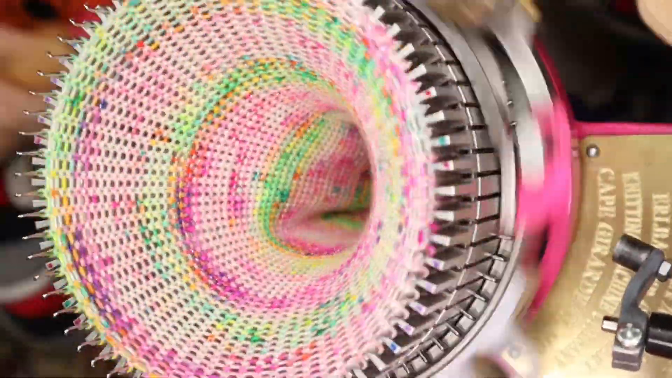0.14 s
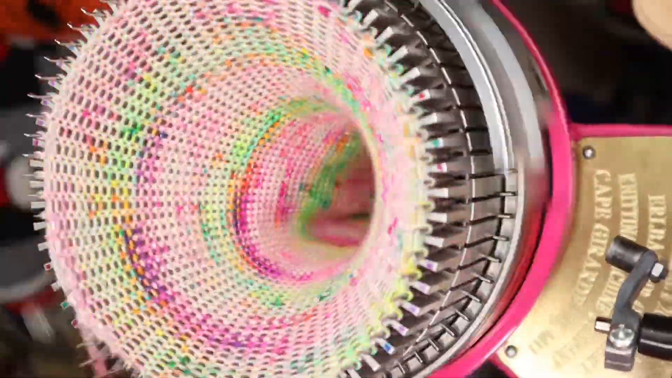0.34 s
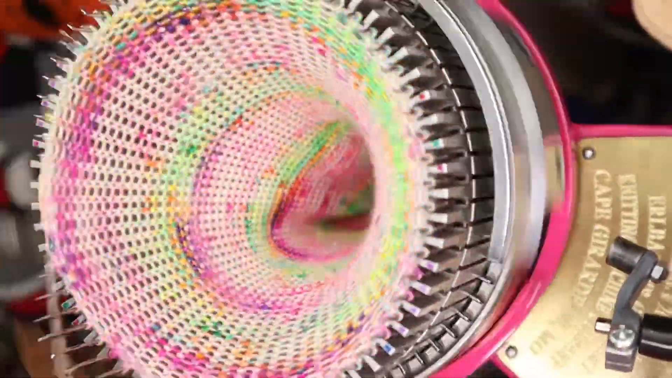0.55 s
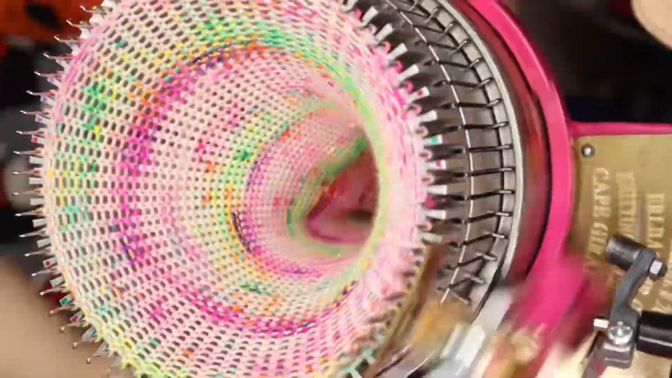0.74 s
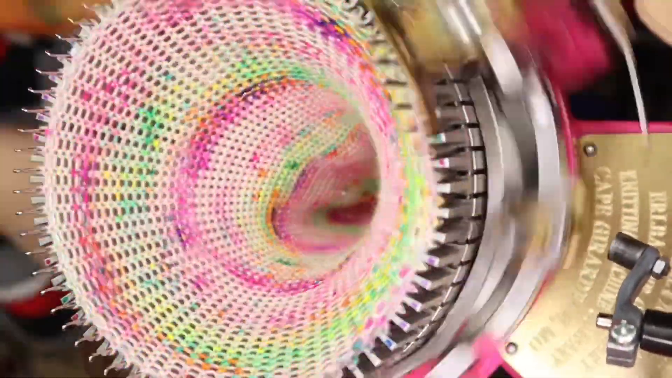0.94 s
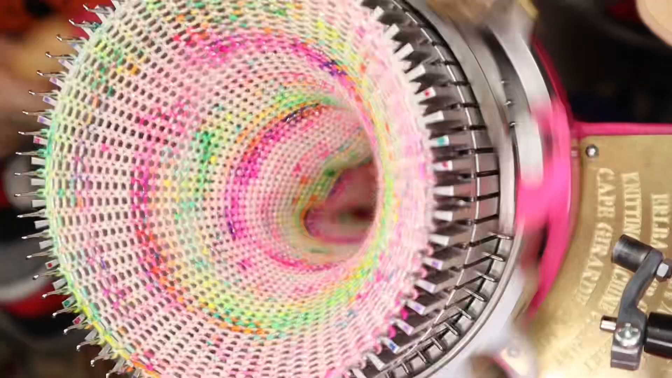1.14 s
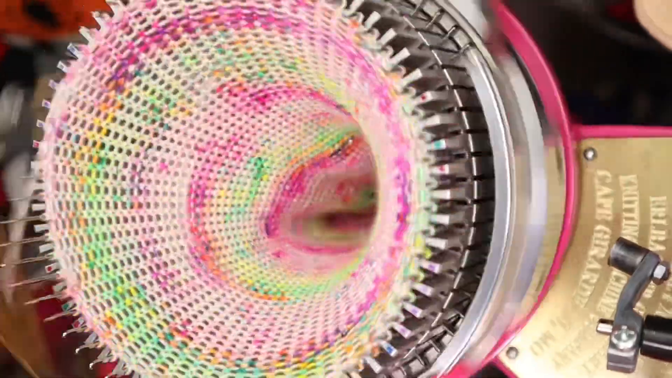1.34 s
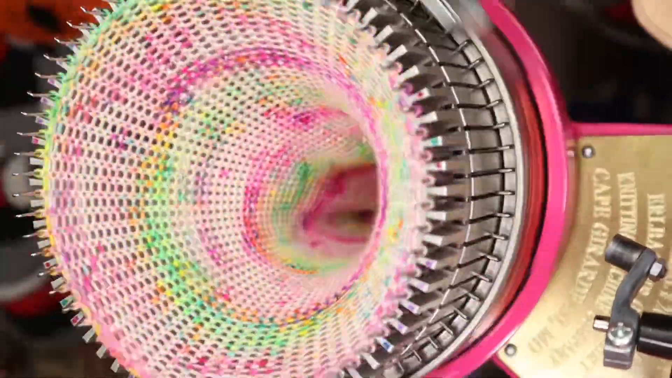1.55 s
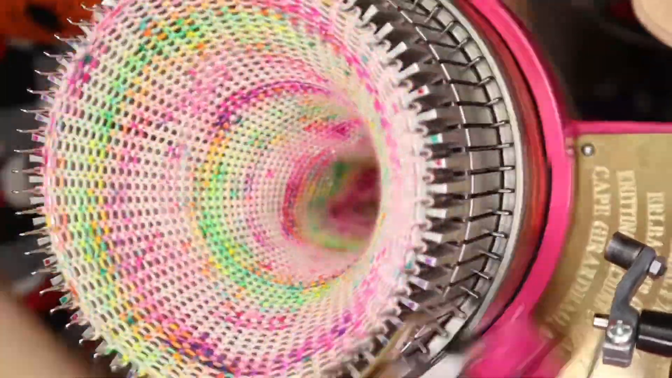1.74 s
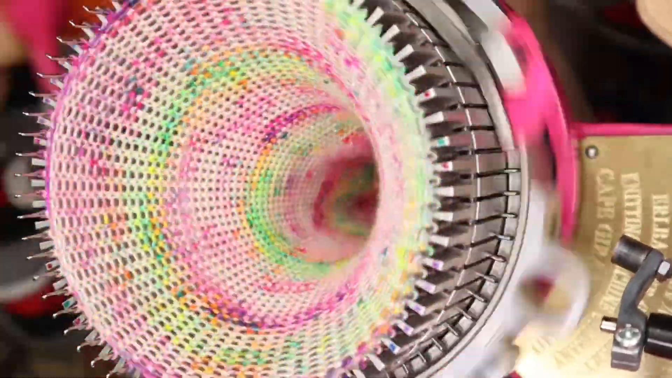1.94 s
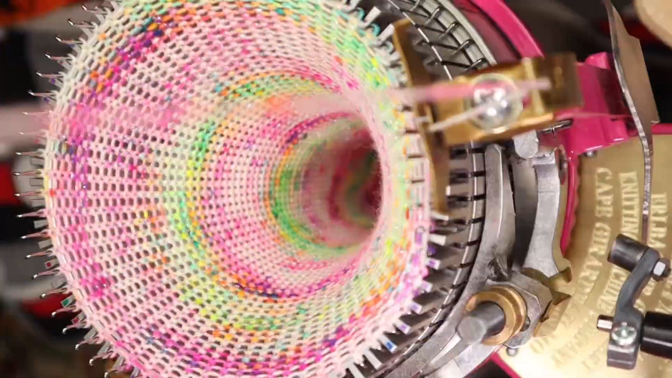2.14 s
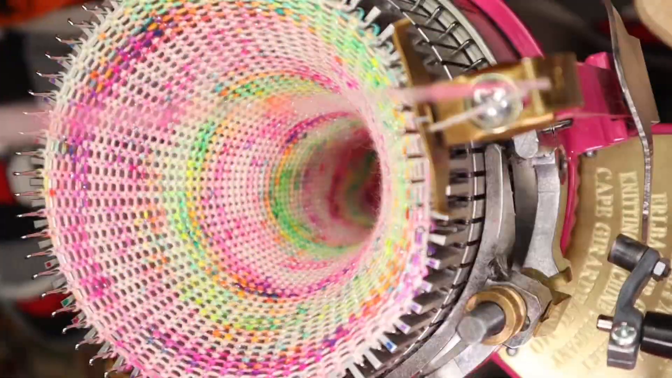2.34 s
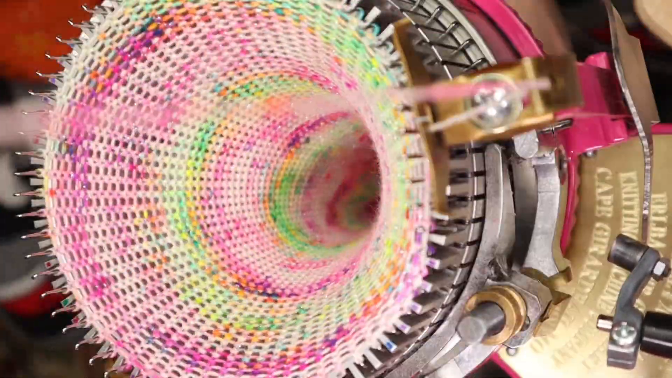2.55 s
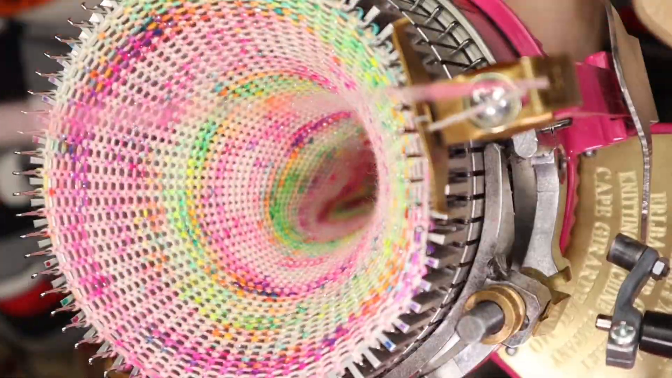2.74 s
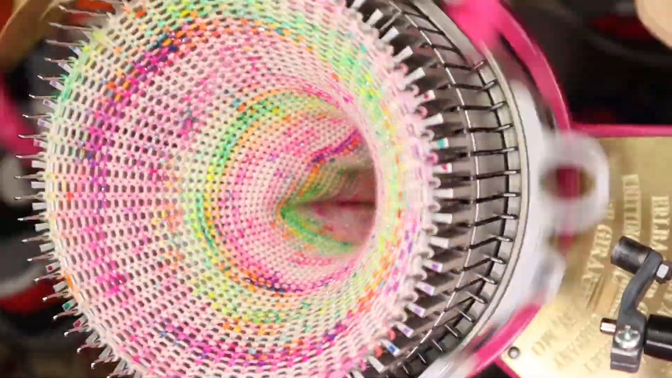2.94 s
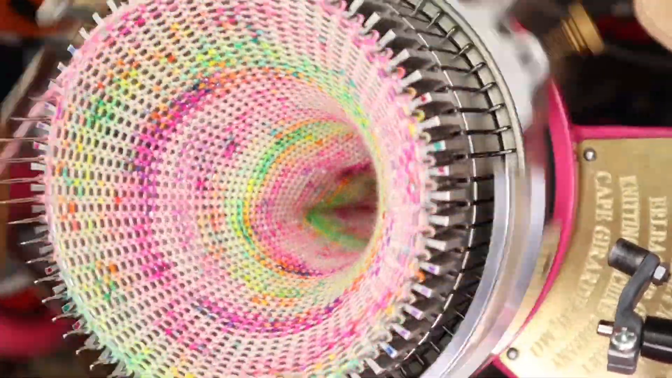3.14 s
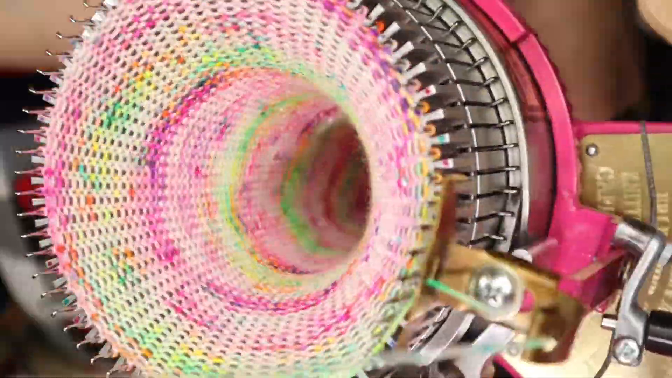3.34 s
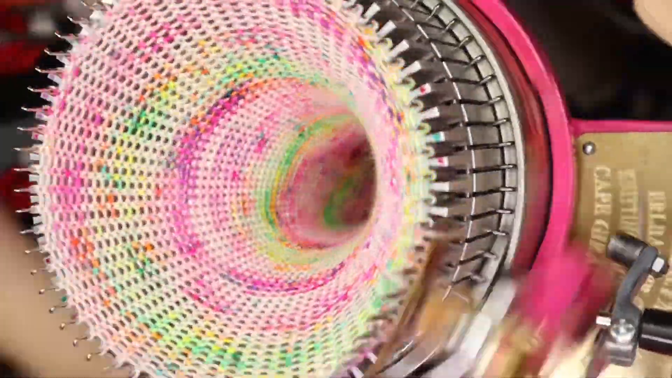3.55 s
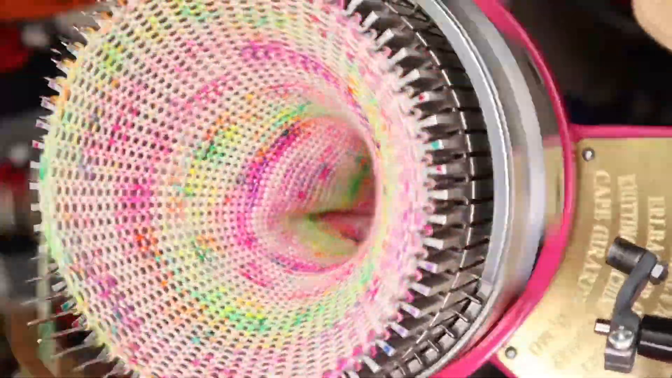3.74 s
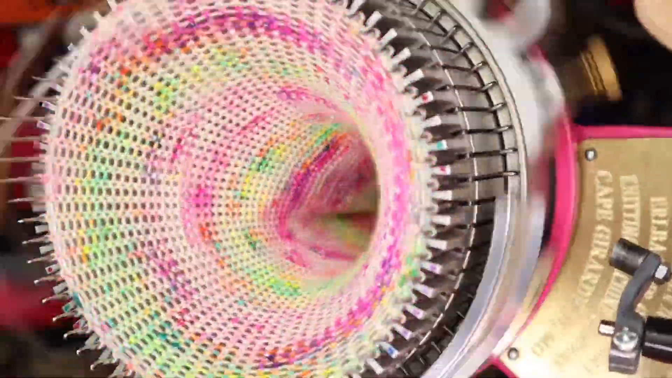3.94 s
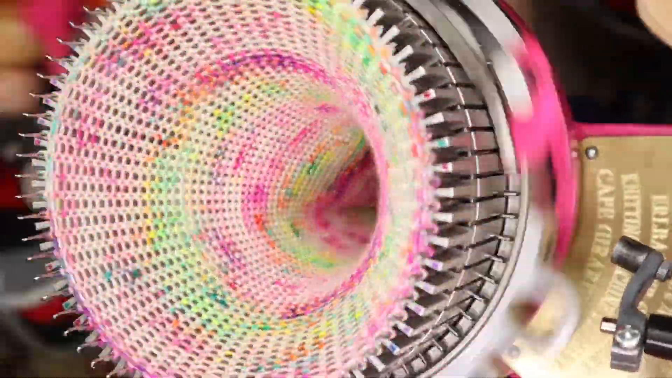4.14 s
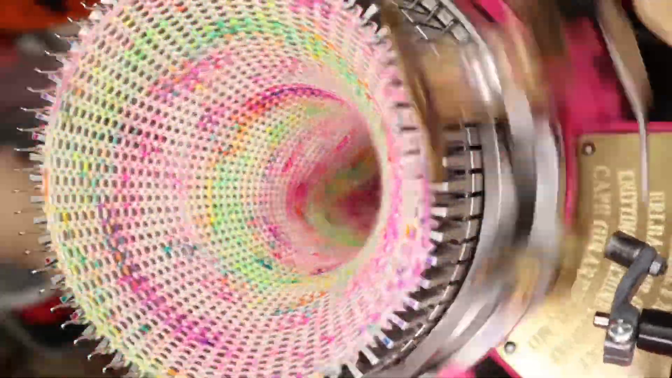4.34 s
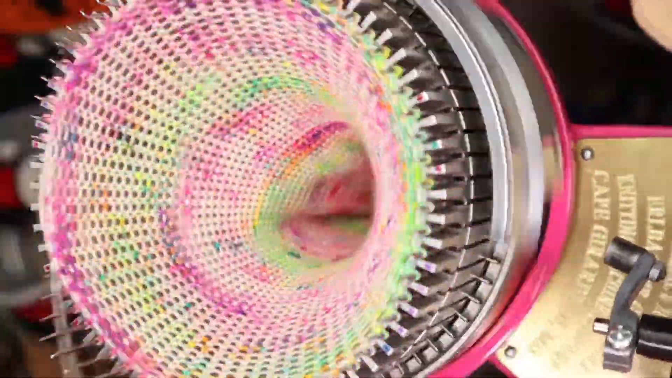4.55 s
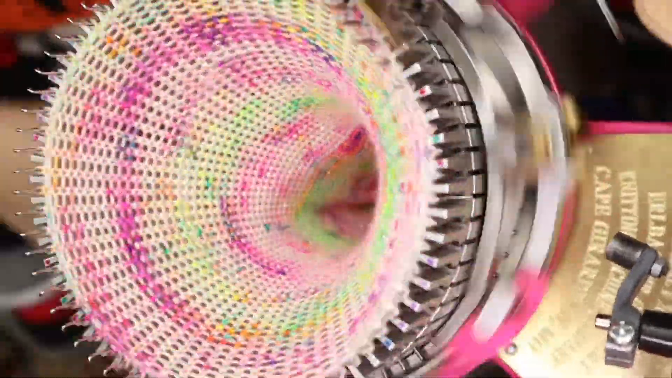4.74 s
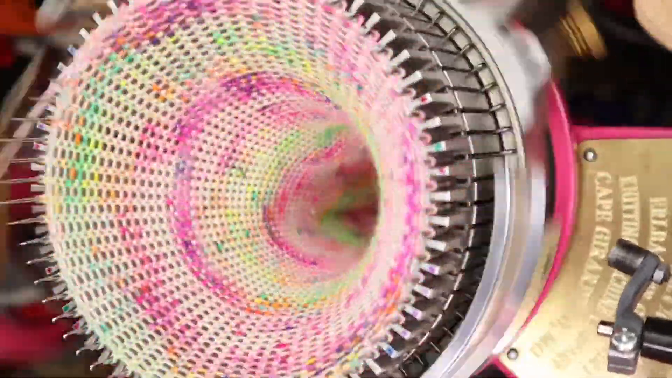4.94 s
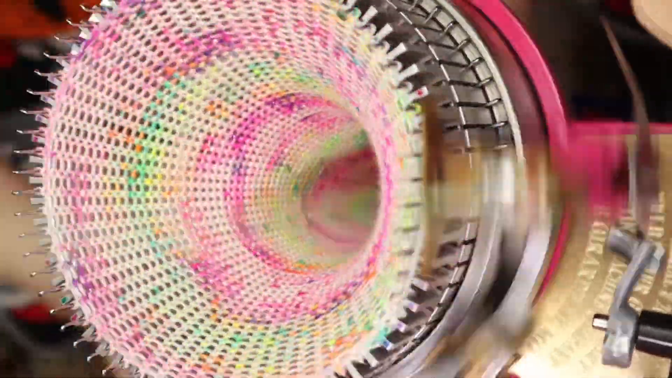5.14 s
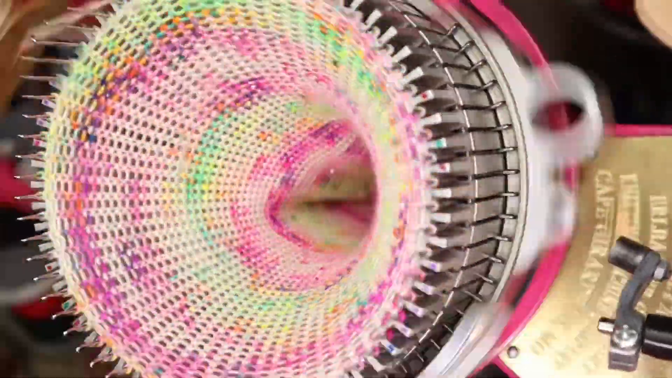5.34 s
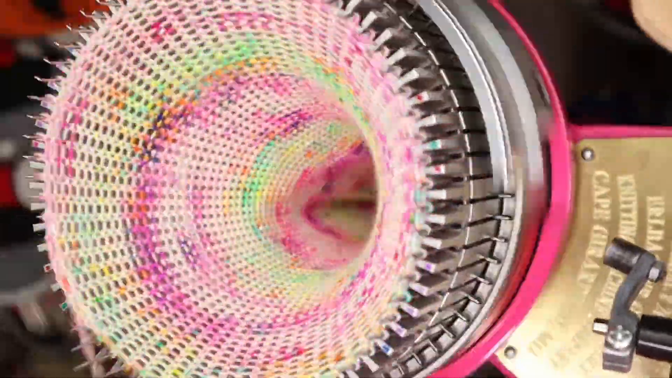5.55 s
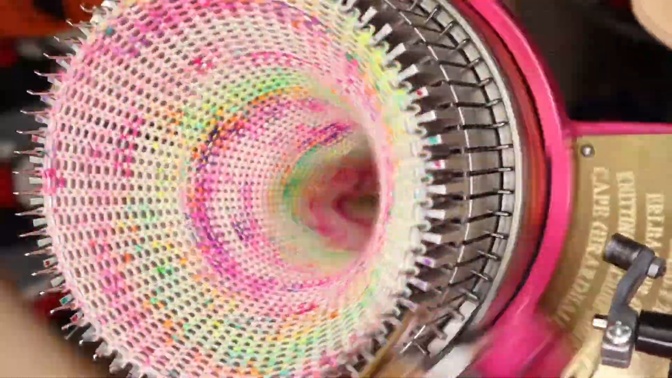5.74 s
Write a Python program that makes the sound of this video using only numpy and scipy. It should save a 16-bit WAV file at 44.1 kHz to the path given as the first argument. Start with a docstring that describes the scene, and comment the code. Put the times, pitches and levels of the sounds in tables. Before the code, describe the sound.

A hand-cranked circular knitting machine runs close to the microphone, its metal needles making a bright, buzzing rasp with a sharp clack about seven times a second. After about two and a half seconds it stops abruptly. Loose parts click, needles tick and yarn rustles faintly under the hands. Then the machine starts again, a little slower, and keeps clattering. The room is small and dry, with faint steady air noise.

```python
"""A hand-cranked sock knitting machine runs close by, indoors, at about seven turns a second.
In each turn the cams strike 72 needles: the train of impacts buzzes, excites the resonances of one
metal part after another and ends in a double clack. Near 2.5 s the machine stops; loose parts click,
hands rub the yarn and needles settle. At 4 s it starts again, a little slower.
A small dry room and its steady air noise lie behind it all."""
import sys
import numpy as np
from scipy import signal
from scipy.fft import rfft, irfft, next_fast_len
from scipy.io import wavfile
from scipy.ndimage import uniform_filter1d

SR = 44100
rng = np.random.default_rng(int(sys.argv[2]) if len(sys.argv) > 2 else 0)


def inscribe(sig):
    """Save sig as 16-bit PCM at rate SR to the path in sys.argv[1].

    A 1-D sig is mono; a 2-D sig holds one channel per row.
    Samples are clipped to [-1, 1] before scaling.
    """
    pcm = np.round(np.clip(np.atleast_2d(sig).T, -1, 1) * 32767)
    wavfile.write(sys.argv[1], SR, pcm.astype(np.int16))


N = 255151
TIME = np.arange(N) / SR
STOP_S, RESTART_S = 2.467, 4.018  # the cams stand still in between
# the clack that ends each turn; the spacing sets the speed: t/s, relative level/dB
CLACKS = [(0.0448, -25.5), (0.1785, -22), (0.3048, -22.5), (0.4353, -28), (0.5753, -26.5), (0.7213, -24.5),
          (0.8618, -20), (0.9951, -22.5), (1.1334, -24.5), (1.267, -22.5), (1.4038, -21.5), (1.5395, -24),
          (1.6813, -24.5), (1.8088, -26), (1.935, -22.5), (2.0675, -25.5), (2.2042, -29.5), (2.3299, -26),
          (4.2141, -24), (4.4333, -23), (4.6105, -26), (4.7697, -25), (4.9382, -24.5), (5.1002, -23),
          (5.2723, -24.5), (5.434, -24.5), (5.594, -22), (5.754, -22.5)]


def machine(usual_turns_per_s=7.32):
    """Source and resonator: needle impacts excite the metal parts, most of them harder with speed."""
    # load on the needles, peaking before the clack: gain/dB, place/turns, spread/turns
    load = [(1.73, 0.827, 0.046), (-1.3, 0.18, 0.07)]
    angle, speed = cam_motion()
    pace = speed / usual_turns_per_s
    ticks = needle_ticks(angle)
    out = pace ** .9 * (slot_rasp(ticks) + cylinder_ring(ticks, angle))
    out += needle_ring(ticks, angle, pace)
    out *= amp(sum(db * near(angle, place, spread) for db, place, spread in load))
    out += shell_ring(ticks, angle) + clack(angle, pace) + gear_groans(angle, speed)
    return out * running()


def turn_ends():
    """Bounds of the rotation periods in s: clacks, stop, restart and one more at each end."""
    s = np.sort(np.r_[np.array(CLACKS)[:, 0], STOP_S, RESTART_S])
    return np.r_[2 * s[0] - s[1], s, 2 * s[-1] - s[-2]]


def cam_motion():
    """Rotation: the angle in turns, and the running speed in turns/s as the inverse of the period."""
    s = turn_ends()
    moving = s[:-1] != STOP_S
    middle, period = (s[:-1] + s[1:]) / 2, np.diff(s)
    angle = np.interp(TIME, s, np.r_[0, np.cumsum(moving)])
    return angle, np.interp(TIME, middle[moving], 1 / period[moving])


def running(brake_s=.013, release_s=.012, attack_s=.014):
    """Envelope: exponential decay from just before the stop, a smooth swell at the restart."""
    release = np.exp(-np.maximum(TIME - STOP_S + brake_s, 0) / release_s)
    return release + .5 + .5 * np.tanh((TIME - RESTART_S - attack_s) / (2 * attack_s))


def needle_ticks(angle, needles=72, surge=.08, fastest_place=.56, jitter_s=.000035, uneven_db=1.1):
    """Rate-modulated impulse train: one tick a needle, as the speed surges and sags within a turn."""
    needle = needles * (angle + surge * np.sin(2 * np.pi * (angle - fastest_place)) / (2 * np.pi))
    at = np.flatnonzero(np.diff(np.floor(needle)) > 0)
    late, size = rng.standard_normal((len(at), 2)).T
    at += np.round(late * jitter_s * SR).astype(int)
    ticks = np.zeros(N)
    ticks[np.clip(at, 0, N - 1)] = amp(uneven_db * size)
    return ticks


def contact_force(ticks, clean, slide, decay_s):
    """Impact and friction: clean ticks, a short scrape after each and a share of even sliding noise."""
    burst = unit_rms(decaying(ticks, decay_s))
    grit = np.sqrt((1 - slide) * burst ** 2 + slide) * rng.standard_normal(N)
    return np.sqrt(clean) * unit_rms(ticks) + np.sqrt(1 - clean) * grit


def passing(force, angle, mode):
    """Forced resonance: one mode, heard while the cams pass its place."""
    hz, width, db, place, spread = mode
    return amp(db) * near(angle, place, spread) * unit_rms(ring(force, hz, width))


def needle_ring(ticks, angle, pace, shank_db=-2, hook_db=-3, uneven_db=1):
    """Forced vibration of the needles; the amplitude follows a power law of speed."""
    # f/Hz, bandwidth/Hz, relative level/dB, place/turns, spread/turns
    needle_modes = [(5800, 2900, -43, 0.39, 0.087), (10250, 3800, -47, 0.4, 0.068),
                    (12160, 430, -48.5, 0.43, 0.014), (2900, 960, -46, 0.446, 0.04),
                    (2580, 820, -47, 0.617, 0.038), (2304, 340, -50, 0.794, 0.097),
                    (9900, 730, -49.5, 0.75, 0.03), (4290, 1360, -44.5, 0.795, 0.064),
                    (2760, 750, -47, 0.863, 0.056), (5066, 320, -39.5, 0.823, 0.036),
                    (10640, 2700, -42.5, 0.886, 0.091), (6250, 2900, -45, 0.907, 0.096),
                    (13150, 1200, -46, 1, .06)]
    ends = turn_ends()
    turn_db = uneven_db * np.interp(TIME, ends, rng.standard_normal(len(ends)))
    shank = amp(shank_db + turn_db) * pace ** 1.46
    hook = amp(hook_db) * pace ** 1.52
    out = np.zeros(N)
    for mode in needle_modes:
        if mode[0] < 3500:  # shanks ring low, with harmonics that glide with the needle rate
            gain, force = shank, contact_force(ticks, clean=.6, slide=.06, decay_s=.0004)
        else:  # hooks and latches ring high and gritty
            gain, force = hook, contact_force(ticks, clean=.087, slide=.31, decay_s=.00065)
        out += gain * passing(force, angle, mode)
    return out


def clack(angle, pace, gain_db=23.5, lag_s=.0032):
    """Impact excitation: a blow and its rebound each turn, further apart when the machine is slow."""
    # f/Hz, bandwidth/Hz, relative level/dB, place at usual speed/turns, decay/s
    clack_modes = [(5150, 830, -35.5, -.008, 0.0049), (6300, 990, -41, -.015, 0.0067),
                   (10500, 2400, -43, -0.0025, 0.0073), (13900, 9900, -39, -0.017, 0.0026),
                   (5200, 3300, -38.5, 0.029, 0.006), (12200, 6200, -41, .04, 0.004)]
    latch_snap = (14800, 5000, -38, -.008, .002)
    out = np.zeros(N)
    for hz, width, db, place, decay_s in [*clack_modes, latch_snap]:
        turns = np.floor(np.interp(TIME - lag_s, TIME, angle - place / pace))
        contact = decaying(np.diff(turns, prepend=turns[0]), decay_s)
        noise = rng.standard_normal(N)
        out += amp(db) * ring(contact * noise, hz, width) / np.std(ring(noise[:SR], hz, width))
    return amp(gain_db + curve(CLACKS)) * out


def slot_rasp(ticks, level_db=-44):
    """Sliding friction: needles make broadband noise in their slots."""
    # f/Hz, relative spectral level/dB
    rasp_spectrum = [(300, -28), (700, -15.5), (1400, -8.5), (1750, -14.5), (2300, -0.5), (3000, 0),
                     (3500, 0.5), (4300, 3), (5600, 5.5), (7200, -5.5), (10400, 0), (12200, -6),
                     (14000, -4.5), (15600, -5)]
    force = contact_force(ticks, clean=.08, slide=.71, decay_s=.00093)
    return amp(level_db) * coloured(force, rasp_spectrum)


def cylinder_ring(ticks, angle, gain_db=.6):
    """Lightly damped modes: the steel cylinder rings clearly under the knocking needles."""
    # f/Hz, bandwidth/Hz, relative level/dB, place/turns, spread/turns
    cylinder_modes = [(2287, 185, -58, 0.74, 0.32), (5080, 116, -51, 0.79, 0.22),
                      (5297, 160, -49.5, 0.93, 0.13), (5696, 78, -56, 0.76, 0.31),
                      (6257, 180, -52, 0.003, 0.13), (6666, 170, -60.5, .2, 0.98),
                      (7655, 330, -61, 0.63, 0.82), (2499, 56, -53, 0.62, 0.063),
                      (2623, 113, -54, 0.745, 0.12), (3028, 96, -55, 0.706, .1), (10370, 200, -57, 1, 0.27),
                      (11730, 75, -57.5, 0.82, 0.12), (12500, 120, -58.5, 0.36, 0.18)]
    force = contact_force(ticks, clean=.05, slide=.1, decay_s=.00022)
    return amp(gain_db) * sum(passing(force, angle, mode) for mode in cylinder_modes)


def shell_ring(ticks, angle, gain_db=-.63):
    """Structure-borne sound: needle contacts drive the low modes of the cam shell and base."""
    # f/Hz, bandwidth/Hz, relative level/dB, place/turns, spread/turns
    shell_modes = [(505.7, 31, -65.5, 0.55, 0.15), (589, 116, -67.5, 0.41, 0.19),
                   (526, 118, -67.5, 0.022, 0.24), (785, 170, -71, 0.15, 0.2), (1143, 74, -62, .56, 0.11),
                   (1151, 80, -61, 0.028, 0.094), (1085, 440, -62, 0.3, 0.09), (1340, 125, -67, 0.55, 0.58)]
    out = np.zeros(N)
    for mode in shell_modes:
        force = contact_force(ticks, clean=.25, slide=.74, decay_s=.00051)
        out += passing(force, angle, mode)
    return amp(gain_db) * out


def gear_groans(angle, speed, turns_per_crank=2, range_turns_per_s=.46):
    """Speed-dependent vibration: each gear tone swells once a crank turn, near its own speed."""
    # f/Hz, level/dB, place/crank turns, spread/crank turns, cam speed/(turns/s)
    groans = [(498, -62, 0.25, 0.13, 6.05), (766, -64, 0.63, .1, 5.7), (648, -62, 0.2, .08, 7.95),
              (626, -64, 0.656, .08, 7.93)]
    out = np.zeros(N)
    for hz, db, place, spread, best_speed in groans:
        speed_gain = np.exp(-.5 * ((speed - best_speed) / range_turns_per_s) ** 2)
        swell = near(angle / turns_per_crank, place, spread)
        out += amp(db) * speed_gain * swell * wavering(np.full(N, hz), waver=.0119)
    return out


def squeals_and_hum():
    """Frequency glides that swell and fade: squeals of sliding metal and a low hum at the restart."""
    # t/s, duration/s, first f/Hz, last f/Hz, level/dB
    glides = [(1.543, 0.047, 4070, 3200, -53), (4.015, .082, 477, 527, -68), (5.33, 0.063, 706, 542, -59.5)]
    out = np.zeros(N)
    for s, length, first, last, db in glides:
        count = int(length * SR)
        tone = wavering(np.geomspace(first, last, count), waver=.0068)
        add(out, s, amp(db) * unit_rms(tone * np.hanning(count)))
    return out


def clicks(thud_db=-20.5, knee_db=-44, thud_growth=.5):
    """Impacts: the machine's last clack as it stops and its first clacks as it restarts, and loose parts
    clicking in between. A dying noise burst excites a ring, a crack and a thud of the base."""
    # t/s, level/dB, ring f/Hz, bandwidth/Hz, decay/s, relative crack level/dB, left minus right/dB
    impacts = [(2.481, -42, 11000, 4500, 0.0038, 3, -4.5), (2.509, -51, 1130, 700, 0.0038, -7, .5),
               (2.52, -55.5, 1150, 700, .0045, -4, .5), (2.861, -49, 4830, 1500, .0022, -4, 0),
               (2.907, -51, 5600, 3000, 0.0089, -15, -2), (2.972, -34, 5660, 1990, 0.0021, 0.5, -3.5),
               (2.973, -53, 640, 220, 0.0045, -20, 0), (2.981, -39.5, 3660, 700, 0.0025, -4, -2),
               (3.027, -39, 1340, 686, 0.0033, -33, 1), (3.06, -45, 2080, 2800, 0.00068, -8.5, 3),
               (3.595, -49.5, 4830, 1100, 0.0016, -0.5, .5), (3.655, -46, 4530, 3000, 0.0063, -7, -5),
               (3.664, -44, 5100, 3500, 0.005, -7, -3), (3.668, -44.5, 5340, 2980, .003, -9, -3),
               (4.017, -47, 11100, 7000, .001, -4, -4), (4.022, -41.5, 5500, 2000, .0018, -7, -3),
               (4.034, -43, 5700, 3000, .0037, -1, -2.5)]
    out, t = np.zeros((2, N)), np.arange(SR // 20) / SR
    unit = lambda x: x / np.sqrt(np.sum(x ** 2) / (.004 * SR))  # the energy of 4 ms at rms 1
    for s, db, hz, width, decay, crack_db, lean_db in impacts:
        burst = rng.standard_normal(len(t)) * np.exp(-t / decay)
        crack = amp(crack_db) * unit(ring(burst, hz=7800, width=12000))
        thud = amp(thud_db + thud_growth * (db - knee_db)) * unit(ring(burst, hz=690, width=800))
        click = unit(ring(burst, hz, width)) + crack + thud
        add(out[0], s, amp(db + lean_db / 2) * click)
        add(out[1], s, amp(db - lean_db / 2) * click)
    return out


def yarn_rustle(gain_db=-3, holding_db=-62, grain_db=2, sheen_db=-4, skew=.73):
    """Friction of hands on yarn during the stop: grainy noise, with a high sheen on each rub."""
    # t/s, duration/s, relative level/dB
    strokes = [(2.477, .2, -57), (2.822, .12, -54), (3.05, 0.067, -51), (3.22, .13, -55.5),
               (3.477, .045, -56.5), (3.586, 0.13, -53), (3.959, 0.08, -51)]
    # f/Hz, relative spectral level/dB
    yarn_spectrum = [(590, -44), (1000, -20), (1220, -2.5), (1400, -12), (2870, -7), (14200, -15),
                     (16000, -6.5)]
    grains = amp(grain_db * unit_rms(uniform_filter1d(rng.standard_normal(N), size=60)))
    yarn = coloured(grains * rng.standard_normal(N), yarn_spectrum)
    holding = amp(holding_db) * ((TIME > STOP_S) & (TIME < RESTART_S))
    rubs = sum(amp(db) * np.sin(np.pi * np.clip((TIME - s) / length, 0, 1) ** skew)
               for s, length, db in strokes)
    sheen = unit_rms(ring(grains * rng.standard_normal((2, N)), hz=14300, width=6000))
    return amp(gain_db) * (np.maximum(holding, rubs) * yarn + amp(sheen_db) * rubs * sheen)


def settling_needles(count=12, softest_db=-56, range_db=4, low_hz=1700, high_hz=12000, decay_s=.0014):
    """Damped vibration: needles tick faintly during the stop, each at its own pitch."""
    out, t = np.zeros(N), np.arange(SR // 50) / SR
    for when, pitch, size in rng.random((count, 3)):
        hz = low_hz * (high_hz / low_hz) ** pitch
        tick = unit_rms(ring(rng.standard_normal(len(t)), hz, hz / 2)) * np.exp(-t / decay_s)
        add(out, STOP_S + when * (RESTART_S - STOP_S), amp(softest_db + range_db * size) * tick)
    return out


def stereo_width(x):
    """Decorrelation: a diffuse copy with random phases, heard in a few bands, mostly high treble."""
    # f/Hz, gain/dB
    side_gain = [(100, -53), (800, -51), (1300, -22), (2000, -46), (3100, -53), (4200, -22.5), (6000, -15),
                 (8000, -37), (10000, -9), (15500, -1)]
    frames = signal.stft(x, nperseg=128)[2]
    frames = frames * np.exp(2j * np.pi * rng.random(frames.shape))
    diffuse = np.sqrt(2) * signal.istft(frames, nperseg=128)[1][:N]
    return shaped(diffuse, lambda hz: amp(read(side_gain, hz)))


def echoes(x, t60=.35, delay_s=.009):
    """Reverberation: a small room returns an exponentially dying cloud of reflections."""
    t = np.arange(SR // 2) / SR
    taps = rng.standard_normal(len(t)) * amp(-60 * t / t60) * (t >= delay_s)
    return signal.fftconvolve(x, taps / np.linalg.norm(taps))[:N]


def room_tone(air_db=-64, whine_hz=1200, whine_db=-74.5):
    """Ambient field: steady air noise, coherent in the bass and wide in the treble, and a thin whine."""
    # f/Hz, relative spectral level/dB
    air_spectrum = [(25, -1.5), (50, -23), (87, -19.5), (170, -8.5), (317, -1.5), (430, -2), (600, -1.5),
                    (900, 0.5), (1300, -6.5), (1600, -3), (2350, -5), (3160, -7.5), (7310, -11),
                    (16000, -17)]
    # f/Hz, side level against the middle/dB
    air_width = [(30, -11), (150, -23), (400, -20), (800, -16), (1400, -4.5), (2200, -5.5), (6000, 5.5),
                 (13000, 6.5), (16000, 2)]
    middle, side = (coloured(noise, air_spectrum) for noise in rng.standard_normal((2, N)))
    side = shaped(side, lambda hz: amp(read(air_width, hz)))
    whine = amp(whine_db) * unit_rms(np.sin(2 * np.pi * whine_hz * TIME))
    return amp(air_db) * (middle + np.array([side, -side])) + whine


def amp(db):
    """Decibels to amplitude ratio."""
    return 10 ** (np.asarray(db) / 20)


def unit_rms(x):
    """Normalisation to rms 1."""
    return x / np.sqrt(np.mean(x ** 2) + 1e-20)


def curve(points):
    """Linear interpolation in time."""
    return np.interp(TIME, *np.transpose(points))


def read(points, hz):
    """Interpolation on a log-frequency axis."""
    f, value = np.transpose(points)
    return np.interp(np.log(hz + 1), np.log(f + 1), value)


def shaped(x, gain):
    """Zero-phase filtering by a gain that is a function of frequency."""
    size = next_fast_len(x.shape[-1] + 2048)
    return irfft(rfft(x, size) * gain(np.fft.rfftfreq(size, 1 / SR)), size)[..., :x.shape[-1]]


def coloured(x, spectrum):
    """Spectral shaping, at rms 1."""
    return unit_rms(shaped(x, lambda hz: amp(read(spectrum, hz))))


def ring(x, hz, width):
    """Resonance with steep skirts: the same band-pass twice."""
    b, a = signal.iirpeak(min(hz, .45 * SR), hz / np.clip(width, 5, SR / 4), SR)
    return signal.lfilter(b, a, signal.lfilter(b, a, x))


def decaying(impulses, decay_s):
    """Exponential decay after each impulse."""
    return signal.lfilter([1], [1, -np.exp(-1 / (decay_s * SR))], impulses)


def near(angle, place, spread):
    """Amplitude modulation: a Gaussian swell as a turning part passes one place."""
    return np.exp(-.5 * (((angle - place + .5) % 1 - .5) / spread) ** 2)


def wavering(hz, waver):
    """Random frequency modulation of a tone along a pitch curve."""
    drift = unit_rms(uniform_filter1d(rng.standard_normal(len(hz)), size=240))
    return unit_rms(np.sin(2 * np.pi * np.cumsum(hz * (1 + waver * drift)) / SR))


def add(mix, s, sound):
    """Superposition of a sound at time s."""
    part = mix[max(round(s * SR), 0):][:len(sound)]
    part += sound[:len(part)]


def scene(room_db=-20, handling_room_db=-6):
    """Superposition of direct and reflected sound; the machine's treble is wide, mostly to the right."""
    # f/Hz, left minus right/dB
    balance = [(450, 1.6), (1200, -0.5), (2500, 2), (3400, -1.5), (4500, -2.5), (7000, -4.5), (8000, 1),
               (9400, -0.5), (10600, -6.5), (11600, -2.5), (13400, -5), (14500, 1.5)]
    works = machine() + squeals_and_hum()
    handling = clicks() + yarn_rustle() + settling_needles()
    works += amp(room_db) * echoes(works + amp(handling_room_db) * handling.mean(0))
    sides = np.array([[1], [-1]])
    stereo = works + sides * stereo_width(works + handling.mean(0))
    return shaped(stereo, lambda hz: amp(.5 * sides * read(balance, hz))) + handling + room_tone()


def record(dry):
    """Band limiting: a steep low-pass removes the highest treble."""
    low_pass = signal.firwin(401, cutoff=16080, window=("kaiser", 8), fs=SR)
    return signal.oaconvolve(dry, low_pass[None], "same")


dry = scene()
out = record(dry)
inscribe(out)
```